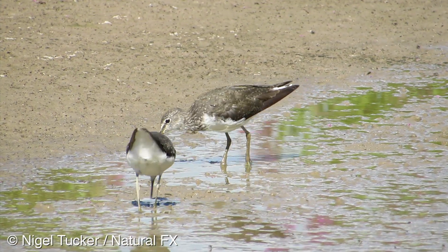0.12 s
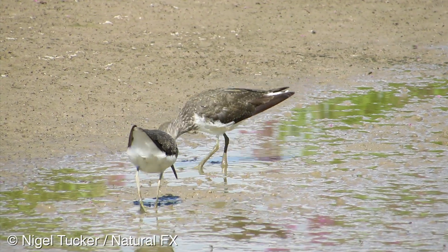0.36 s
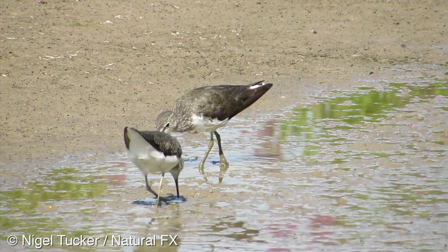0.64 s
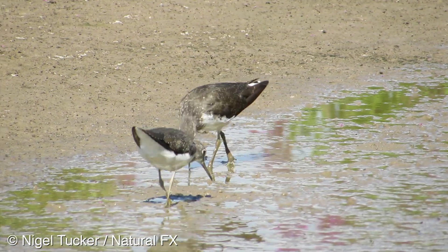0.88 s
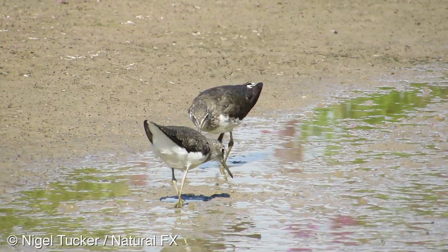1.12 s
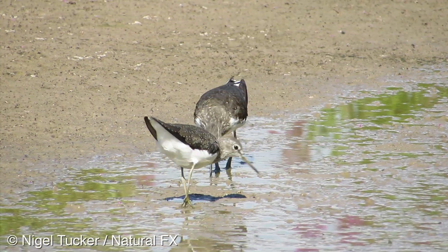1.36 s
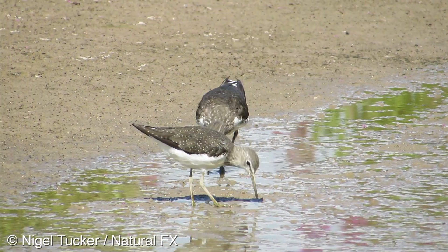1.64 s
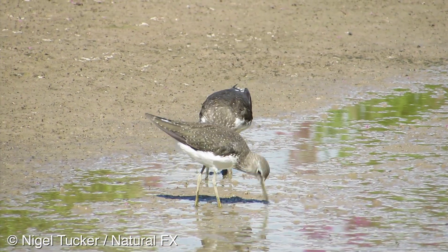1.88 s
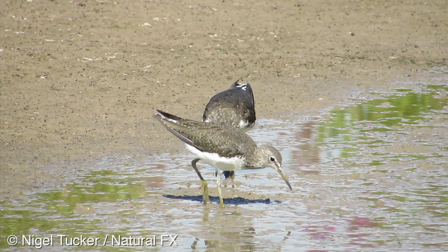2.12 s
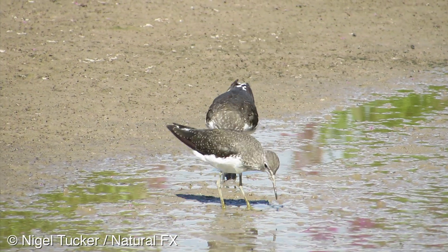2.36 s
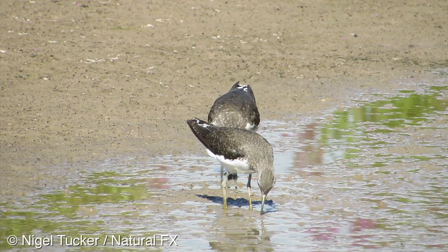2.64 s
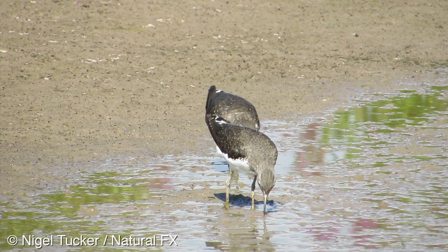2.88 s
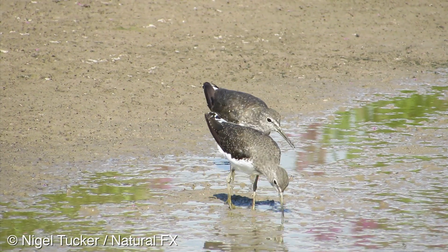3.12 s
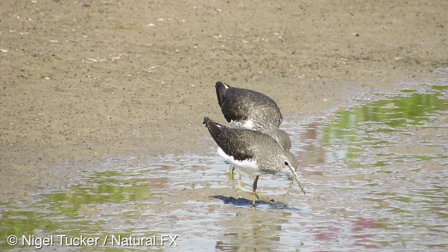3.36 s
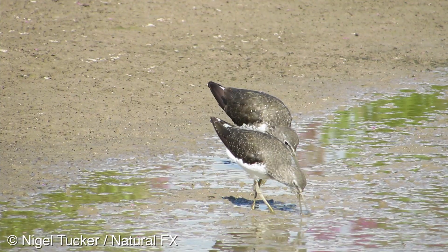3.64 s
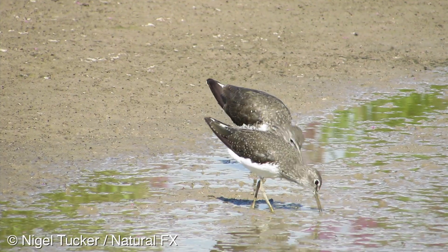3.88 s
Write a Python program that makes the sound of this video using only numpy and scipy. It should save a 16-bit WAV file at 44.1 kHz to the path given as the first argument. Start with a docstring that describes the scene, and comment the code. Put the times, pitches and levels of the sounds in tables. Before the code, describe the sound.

Rapid frog-like croaks, first faint, then bright and hollow callers overlapping, with tiny bird trills; later a wader pipes slurred whistles. Open pond edge, light wind and hiss, heard quietly from a distance.

```python
"""A pond edge heard from a distance. All through, light wind and hiss (one coloured noise) lie under
a murmuring chorus of croaks, and small far birds add slurs and trills (bending near-sine tones).
Faint croaks open the scene; a bright caller joins at 0.3 s and a hollow one at 0.6 s, each croak
being pulses that ring a throat. From 2.4 s a wader pipes slurred whistles, again bending tones, and
faint croaks return. Scattered echoes follow every croak and bird.
"""
import sys
import numpy as np
from scipy import signal
from scipy.io import wavfile
from scipy.ndimage import uniform_filter1d

SR = 44100
rng = np.random.default_rng(int(sys.argv[2]) if len(sys.argv) > 2 else 0)


def materialize(psi):
    """Save the field psi as 16-bit PCM at rate SR to the path in sys.argv[1].

    A 1-D psi becomes a single channel; in a 2-D psi each row is a channel.
    """
    bounded = np.clip(np.atleast_2d(psi).T, -1, 1)
    quanta = np.round(bounded * 32767).astype(np.int16)
    wavfile.write(sys.argv[1], SR, quanta)


def volts_from_db(level):
    """Convert decibel levels to linear amplitude ratios."""
    exponent = np.asarray(level, float) / 20
    return 10 ** exponent


N = 176400  # samples in the scene

# Colour of the wind and hiss: f/Hz, relative level per Hz/dB
WIND_COLOUR = [(20, -68), (75, -16), (170, -10), (306, 0.5), (810, -2), (1200, -4.5), (1620, -3.5),
               (2150, -3), (2600, -14), (3200, -16.5), (4940, -22), (6350, -25), (15500, -29.5)]
# How alike the wind is on the left and right: f/Hz, likeness (1 = identical)
WIND_LIKENESS = [(40, 0.93), (150, 0.99), (380, 0.96), (950, 0.98), (2380, 1), (5980, 0.86), (15000, 0.61)]
# Left-right balance of the wind: f/Hz, left minus right level/dB
WIND_BALANCE = [(60, -3.5), (240, -2), (950, -1), (3770, -1), (15000, -2)]
WIND_DB = -56.5  # rms level

# Throat resonances: f/Hz, width of each of two passes/Hz, level/dB.
# Each croak shifts the frequencies a little.
CHORUS_THROAT = [(858, 350, -3.5), (1240, 740, -5), (1637, 470, 1.5), (2007, 340, 4)]
FAR_THROAT = [(950, 1150, -3), (1422, 110, 11.5), (1564, 760, 2), (1855, 650, 2)]
HOLLOW_THROAT = [(855, 342, -2), (1008, 345, -1), (1420, 125, -6.5), (1580, 290, -3.5), (2034, 450, -9)]
BRIGHT_THROAT = [(1650, 720, -4), (2050, 280, 4.5), (2500, 430, -7.5), (2785, 980, -17)]

# Shape of a croak: peak moment as a share of its length, pulse rate at start and at end as shares
# of the top rate, roughness (0-1) at start and from the peak on, starting level/dB
FAR_SHAPE = (.6, .84, .9, .45, .14, -8)
HOLLOW_SHAPE = (.66, .72, .72, .85, .15, -6)
BRIGHT_SHAPE = (.64, .8, .86, .45, .08, -18)

# Bird trills: first note t/s, last note t/s, number of notes, each note from f/Hz, to f/Hz,
# level of a middle note/dB. Every note varies around these values.
TRILLS = [(0.03, 0.13, 6, 3280, 3890, -67), (0.612, 0.708, 11, 3530, 4550, -60),
          (0.57, 0.598, 3, 3420, 2900, -62), (0.325, 0.36, 5, 3770, 3350, -61.5),
          (0.581, 0.602, 2, 6000, 4900, -64.5), (0.545, 0.593, 4, 4100, 3500, -63),
          (1.079, 1.094, 2, 3800, 3100, -59.5), (1.115, 1.197, 12, 3500, 2950, -59),
          (1.244, 1.317, 7, 3475, 2700, -61.5), (1.273, 1.28, 2, 4400, 3800, -62),
          (1.297, 1.359, 5, 5540, 4670, -67), (1.418, 1.491, 5, 3700, 2900, -66.5),
          (1.47, 1.522, 4, 5480, 4710, -69), (1.634, 1.713, 6, 3710, 3000, -62),
          (1.844, 2.088, 12, 5300, 4900, -63), (1.858, 2.074, 10, 4700, 5000, -74),
          (2.155, 2.202, 3, 6400, 5960, -68.5), (2.416, 2.503, 6, 5100, 6070, -68),
          (2.652, 2.668, 2, 4000, 3250, -65), (2.776, 2.791, 2, 5030, 5900, -64),
          (2.81, 2.889, 6, 5140, 3840, -56.5), (2.799, 2.881, 6, 4300, 5070, -69),
          (3.284, 3.33, 6, 5370, 4800, -71.5), (3.656, 3.755, 5, 5000, 5240, -73)]
# Bird slurs, and at 2.59 s a falling echo tail after the wader's whistle: start t/s, length t/s, from f/Hz,
# middle f/Hz, to f/Hz, level/dB
SLURS = [(0.152, 0.0051, 3500, 3920, 4700, -56), (0.16, 0.017, 4300, 3980, 3400, -63.5),
         (0.197, 0.037, 3500, 4190, 4100, -58.5), (0.306, 0.014, 3600, 4550, 4900, -62),
         (0.337, 0.013, 5000, 5270, 5250, -70), (0.365, 0.0138, 5500, 5300, 5100, -68.5),
         (0.395, 0.028, 5220, 5340, 4800, -68), (0.418, 0.07, 5150, 5220, 5030, -68),
         (0.366, 0.06, 2620, 2630, 2580, -60.5), (.43, 0.086, 3150, 2710, 2600, -63),
         (0.513, 0.024, 3200, 3160, 2980, -53), (0.549, 0.062, 2500, 2430, 2400, -61.5),
         (0.831, 0.011, 3800, 3780, 3700, -59), (0.838, 0.091, 5600, 5464, 5430, -70),
         (1.047, 0.0047, 5100, 4900, 4600, -62), (1.356, 0.02, 3100, 3070, 3160, -60.5),
         (1.598, 0.0068, 5000, 4720, 4400, -64), (1.805, 0.081, 2250, 2360, 2520, -60),
         (1.879, 0.05, 2650, 2568, 2510, -65), (2.026, 0.065, 2850, 3054, 2800, -63),
         (2.108, 0.05, 2850, 2550, 2355, -66.5), (2.272, .048, 5450, 5240, 4900, -71.5),
         (2.303, 0.064, 2920, 3130, 2900, -62.5), (2.33, 0.05, 5600, 5720, 4760, -68.5),
         (2.596, .022, 5400, 5060, 4570, -70), (2.634, 0.018, 4350, 4550, 4480, -64.5),
         (2.675, 0.065, 4700, 5130, 4900, -67), (2.925, 0.07, 4600, 5260, 4230, -66),
         (2.966, .065, 5850, 6100, 6300, -79), (3.026, 0.012, 4300, 4920, 5730, -65.5),
         (3.08, 0.017, 5300, 4640, 4300, -63.5), (3.102, 0.016, 3850, 3497, 2970, -59),
         (3.222, 0.017, 5200, 4600, 4250, -63.5), (3.37, 0.015, 3200, 3170, 3200, -64),
         (2.59, 0.045, 2500, 2370, 2210, -61), (3.413, .028, 5200, 4700, 4100, -70),
         (3.485, 0.099, 2680, 2671, 2660, -71), (3.868, 0.027, 2300, 2420, 2640, -65.5),
         (3.774, 0.024, 5200, 4830, 4200, -72)]
# Wader whistles, jumping between pitches: start t/s, length t/s, from f/Hz, middle f/Hz, to f/Hz,
# level/dB
WADER_WHISTLES = [(2.408, 0.063, 2257, 2360, 2590, -52.5), (2.454, 0.064, 2670, 2653, 2566, -50),
                  (2.514, 0.069, 2618, 2653, 2614, -47.5), (2.474, 0.092, 2386, 2370, 2290, -55),
                  (2.864, 0.073, 2290, 2403, 2550, -54), (2.928, 0.063, 2676, 2732, 2716, -52),
                  (2.986, 0.081, 2727, 2764, 2570, -47), (3.081, 0.038, 2410, 2440, 2620, -51.5),
                  (3.124, 0.087, 2643, 2564, 2395, -50), (3.215, 0.042, 2390, 2410, 2240, -51),
                  (3.281, 0.0555, 2225, 2356, 2420, -53.5), (3.333, 0.12, 2550, 2618, 2560, -54.5),
                  (3.462, .055, 2506, 2500, 2320, -56.5), (3.571, 0.042, 2430, 2315, 2410, -55),
                  (3.617, 0.042, 2490, 2460, 2380, -54)]

# Croaks, for faint ones further away, the hollow caller and the bright caller:
# start t/s, length t/s, rms level/dB, top pulse rate f/Hz
FAR_CROAKS = [(0, 0.039, -58, 312), (.10, 0.081, -56.5, 300), (.26, 0.13, -52.5, 305.5),
              (.415, 0.0506, -49, 310), (.91, 0.096, -52, 301), (.56, 0.07, -55.5, 298),
              (2.44, 0.065, -53.5, 319.5), (2.56, 0.076, -58, 321.3), (2.69, 0.054, -56, 310),
              (2.83, 0.04, -55.5, 330), (2.945, 0.055, -56, 320.4), (3.07, 0.059, -58, 310),
              (3.19, 0.065, -57.5, 310), (3.36, 0.07, -56, 300), (3.57, 0.049, -58.5, 310),
              (3.71, 0.042, -57.5, 310), (3.84, 0.061, -62.5, 310)]
HOLLOW_CROAKS = [(.605, 0.071, -58.5, 337), (.755, 0.07, -53, 331), (.89, 0.077, -52, 335.4),
                 (1.055, 0.057, -49.5, 332.8), (1.181, 0.079, -50.5, 333), (1.328, 0.078, -49.5, 334),
                 (1.473, 0.074, -50, 334), (1.612, 0.08, -49, 336.2), (1.752, 0.071, -48, 333),
                 (1.896, 0.061, -48.5, 329.5), (2.033, 0.067, -49, 331), (2.17, 0.069, -48, 328.5),
                 (2.302, 0.078, -51, 324)]
BRIGHT_CROAKS = [(.338, 0.053, -52.5, 334.4), (.484, 0.072, -45.5, 319.2), (.658, 0.06, -43, 320.7),
                 (.818, 0.069, -43, 323), (.99, 0.0606, -45, 315), (1.171, 0.036, -47, 311.4)]


def evened(x):
    """Scales a sound to rms 1."""
    return x / np.sqrt(np.mean(x ** 2) + 1e-20)


def read_curve(points, hz):
    """Reads a table between its points, on a log-frequency axis."""
    f, value = np.transpose(points)
    return np.interp(np.log(hz + 1), np.log(f + 1), value)


def add(mix, start_s, sound):
    """Mixes a sound in from start_s, cutting it off at the end of the mix."""
    part = mix[round(start_s * SR):][:len(sound)]
    part += sound[:len(part)]


def wander(n, span):
    """A smooth random curve of rms 1: noise averaged twice over span points."""
    return evened(uniform_filter1d(uniform_filter1d(rng.standard_normal(n), span), span))


def resonate(x, hz, width_hz):
    """A resonance of gain 1, at a fixed pitch or following a curve: shift to 0 Hz, smooth, shift back."""
    turn = np.exp(2j * np.pi * np.cumsum(hz * np.ones(len(x))) / SR)
    r = np.exp(-np.pi * width_hz / SR)
    return 2 * (turn * signal.lfilter([1 - r], [1, -r], x / turn)).real


def wind(patchy_db=0.85, flicker_db=0.35, frames_wide=14, bins_wide=12):
    """Wind and hiss: coloured stereo noise with drifting patches in pitch and time, and a shared swell."""
    frames = N // 256 + 5
    hz = np.fft.rfftfreq(1024, 1 / SR)
    a, b, c, d, patches = rng.standard_normal((frames, 513, 5)).T
    patches = uniform_filter1d(uniform_filter1d(patches, bins_wide, 0), frames_wide, 1)
    patches = evened(patches)
    left, separate = a + 1j * b, c + 1j * d
    same = np.clip(read_curve(WIND_LIKENESS, hz), -1, 1)[:, None]
    right = same * left + np.sqrt(1 - same ** 2) * separate
    right = right * volts_from_db(-read_curve(WIND_BALANCE, hz))[:, None]
    colour_db = read_curve(WIND_COLOUR, hz)[:, None]
    swell_db = flicker_db * wander(frames, frames_wide)
    spectra = np.array([left, right]) * volts_from_db(colour_db + patchy_db * patches + swell_db)
    noise = signal.istft(spectra, nperseg=1024, noverlap=768)[1][:, :N]
    return volts_from_db(WIND_DB) * evened(noise)


def chorus():
    """85 distant croaks at random moments; a bigger scale means higher pulse rate and resonances."""
    out = np.zeros(N)
    for when, long, size, loud in rng.random((85, 4)):
        start_s = when * N / SR
        scale = .86 + .24 * size
        db = -65 - 1.51 * start_s - 2.2 * np.log(loud)  # fades through the scene; a few stand out
        throat = [(f * scale, width, g_db) for f, width, g_db in CHORUS_THROAT]
        add(out, start_s, croak(0.0504 + 0.048 * long, db, 310 * scale, throat, FAR_SHAPE))
    return out


def tone(hz, gain):
    """A near-sine whistle whose pitch wavers by 0.8 % rms."""
    wavering_hz = hz * (1 + .008 * wander(len(hz), 60))
    turns = np.cumsum(wavering_hz) / SR + rng.random()
    return np.sqrt(2) * gain * np.sin(2 * np.pi * turns)


def slur(length_s, from_hz, middle_hz, to_hz, db, soft=.45):
    """A short whistle bending smoothly through three pitches; a larger soft rounds its ends more."""
    u = np.arange(0, length_s, 1 / SR) / length_s
    hz = from_hz * (1 - u) * (1 - 2 * u)
    hz = hz + 4 * middle_hz * u * (1 - u)
    hz = hz + to_hz * u * (2 * u - 1)
    return tone(hz, volts_from_db(db) * np.sin(np.pi * u) ** soft)


def twitter():
    """Faint far birds: 70 short glides at random moments and pitches."""
    out = np.zeros(N)
    for when, long, pitch, bend, glide, loud in rng.random((70, 6)):
        hz = 1900 * 2.8 ** pitch
        middle_hz, to_hz = hz * (.94 + .1 * bend), hz * (.82 + .26 * glide)
        note = slur(.012 + .06 * long ** 2, hz, middle_hz, to_hz, -81 + 8 * loud)
        add(out, when * N / SR, note)
    return out


def trills():
    """Runs of quick sweeps, strongest mid-run, each a little different in timing, strength and pitch."""
    out = np.zeros(N)
    for first_s, last_s, notes, from_hz, to_hz, middle_db in TRILLS:
        times, gap_s = np.linspace(first_s, last_s, round(notes), retstep=True)
        arch = np.sin(np.linspace(.15, .85, len(times)) * np.pi) - 1
        note_s = min(.5 * gap_s, .008)
        chances = rng.standard_normal((16, 3))
        for start_s, arch_db, (strength, pitch, late) in zip(times, 6 * arch, chances):
            shift = 1 + .012 * pitch * abs(from_hz - to_hz) / 1000  # wide sweeps scatter more
            middle_hz = (from_hz + to_hz) / 2
            db = middle_db + arch_db + 1.5 * strength
            note = slur(note_s, from_hz * shift, middle_hz * shift, to_hz * shift, db, soft=0.26)
            add(out, start_s + .06 * gap_s * late, note)
    return out


def slurs():
    """Small birds' single notes, and at 2.59 s a falling echo tail after the wader's whistle: tones bending
    through three pitches."""
    out = np.zeros(N)
    for start_s, *note in SLURS:
        add(out, start_s, slur(*note))
    return out


def wader():
    """Piped whistles: bending tones with firm ends, some overlapping."""
    out = np.zeros(N)
    for start_s, *note in WADER_WHISTLES:
        add(out, start_s, slur(*note, soft=0.23))
    return out


def croak(length_s, db, top_hz, throat, shape):
    """Pulses speed up and steady towards the peak, then slow down, and ring the throat's resonances."""
    peak, first, last, rough_start, rough_peak, start_db = shape
    u = np.arange(0, length_s, 1 / SR) / length_s
    before = np.clip(1 - u / peak, 0, 1)  # falls 1 to 0 up to the peak
    after = np.clip((u - peak) / (1 - peak), 0, 1)  # rises 0 to 1 from the peak
    rough = rough_peak + (rough_start - rough_peak) * before

    pulse_hz = top_hz * (1 - (1 - first) * before ** 1.4 - (1 - last) * after ** 1.7)
    ragged_hz = pulse_hz * (1 + .16 * rough * wander(len(u), 70))
    turns = np.cumsum(ragged_hz) / SR + rng.random()
    folds = sum(np.cos(2 * np.pi * k * turns) for k in range(1, 12))  # clean pulses
    breath = resonate(rng.standard_normal(len(u)), 1600, 3000)
    puffs = (.25 + np.exp(-(turns % 1) / .3)) * breath  # a burst of noise on each pulse
    drive = (1 - rough) * evened(folds) + rough * evened(puffs)

    # the throat partly follows the pulse rate and opens differently for each croak
    mouth = (pulse_hz / top_hz) ** .2 * (1 + .025 * rng.standard_normal())
    voice = np.zeros(len(u))
    for k, (f, width_hz, g_db) in enumerate(throat):
        ring = resonate(resonate(drive, f * mouth, width_hz), f * mouth, width_hz)
        voice += (-1) ** k * volts_from_db(g_db) * ring  # neighbours have opposite signs
    swell = volts_from_db(start_db * before ** 2) * np.cos(np.pi / 2 * after) ** .8 * np.minimum(u / .1, 1)
    return volts_from_db(db) * evened(voice * swell)


def callers():
    """The faint, hollow and bright croaks, each kind with its own throat and shape."""
    out = np.zeros(N)
    for rows, throat, shape in ((FAR_CROAKS, FAR_THROAT, FAR_SHAPE),
                                (HOLLOW_CROAKS, HOLLOW_THROAT, HOLLOW_SHAPE),
                                (BRIGHT_CROAKS, BRIGHT_THROAT, BRIGHT_SHAPE)):
        for start_s, length_s, db, top_hz in rows:
            add(out, start_s, croak(length_s, db, top_hz, throat, shape))
    return out


def banks(x):
    """Scattered echoes from water and banks: sparse random spikes dying by 60 dB in 0.25 s."""
    t = np.arange(SR // 4) / SR
    spikes = rng.standard_normal((2, len(t))) * (rng.random((2, len(t))) < .05)
    tail = spikes * volts_from_db(-60 * t / .25) * (t > .004)
    tail = np.array([tail[0], tail[0] + .4 * tail[1]])  # the right side gets some echoes of its own
    return signal.fftconvolve(x[None], tail / np.linalg.norm(tail[0]), axes=1)[:, :N]


def scene():
    """Callers and birds with their echoes, leaning 0.9 dB to the right, over the wind."""
    animals = chorus() + twitter() + trills() + slurs() + wader() + callers()
    animals = animals + volts_from_db(-13) * banks(animals)
    animals = animals * volts_from_db(np.array([[-.45], [.45]]))
    return animals + wind()


def band_limit(x):
    """A steep low-pass at the top of the band."""
    return signal.sosfilt(signal.butter(12, 15620, fs=SR, output="sos"), x)


def record(dry):
    """Turns the finished mix into the sound that is saved."""
    return band_limit(dry)


dry = scene()
out = record(dry)
materialize(out)
```